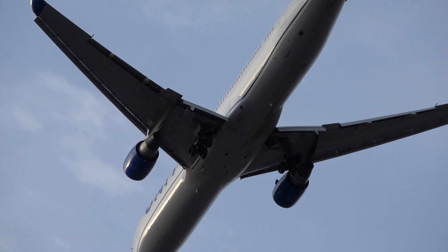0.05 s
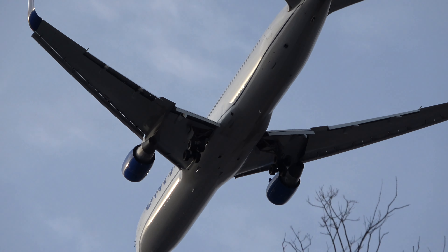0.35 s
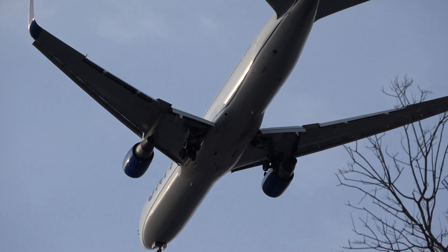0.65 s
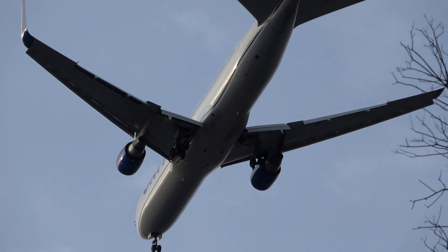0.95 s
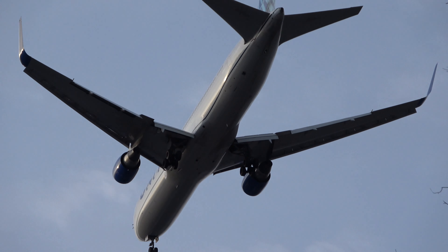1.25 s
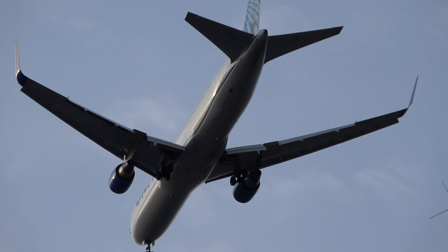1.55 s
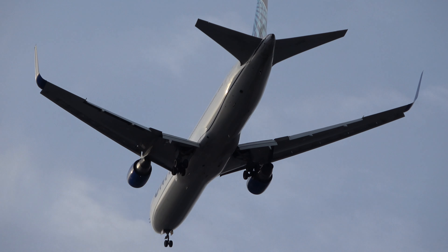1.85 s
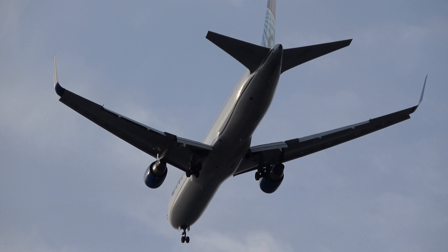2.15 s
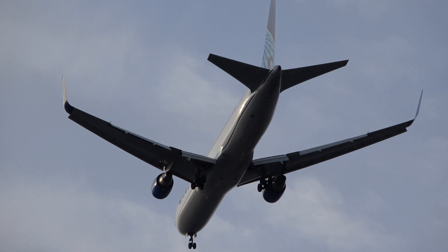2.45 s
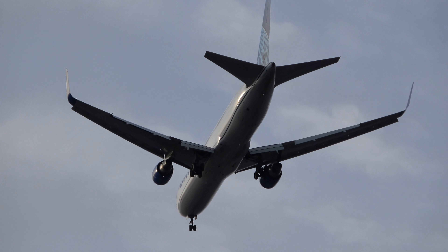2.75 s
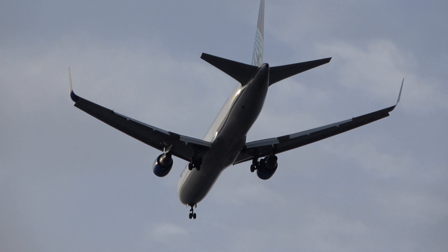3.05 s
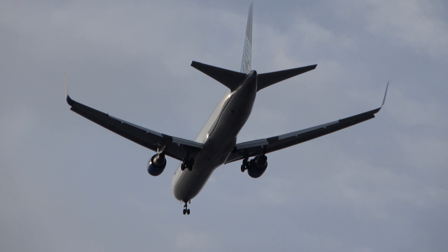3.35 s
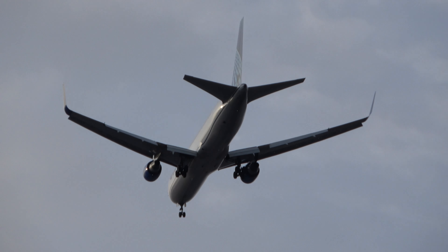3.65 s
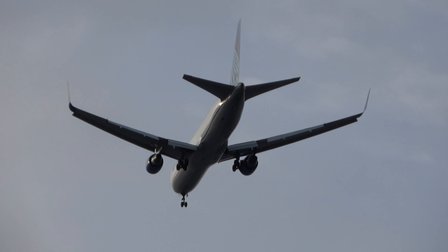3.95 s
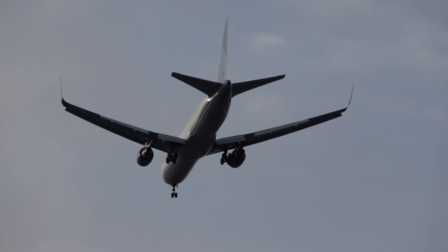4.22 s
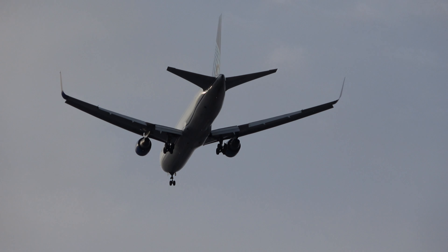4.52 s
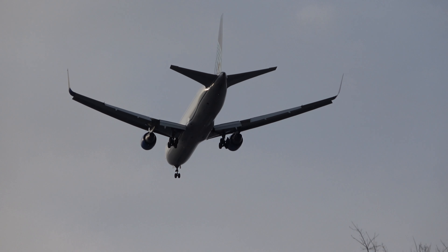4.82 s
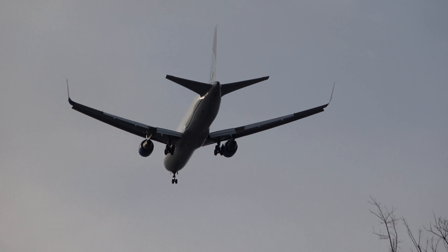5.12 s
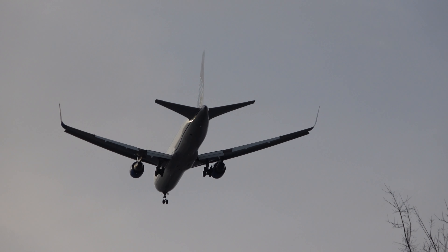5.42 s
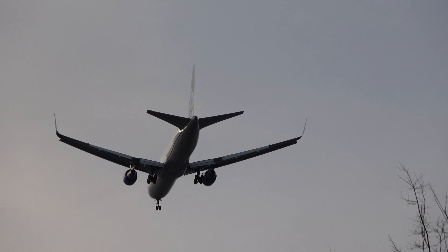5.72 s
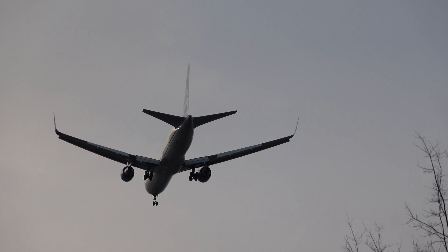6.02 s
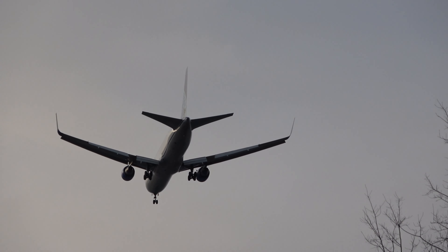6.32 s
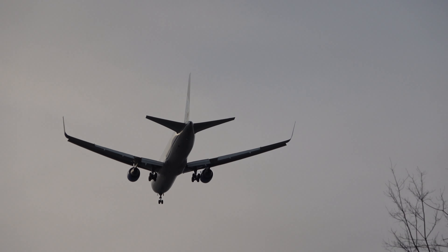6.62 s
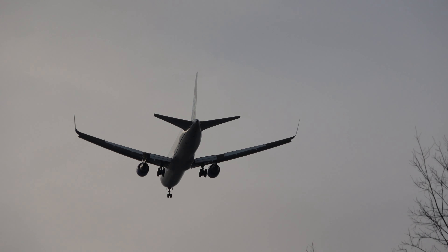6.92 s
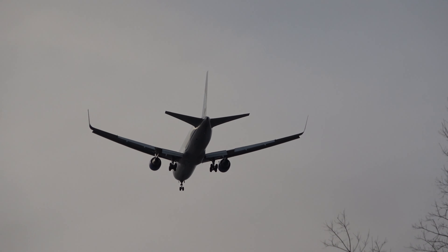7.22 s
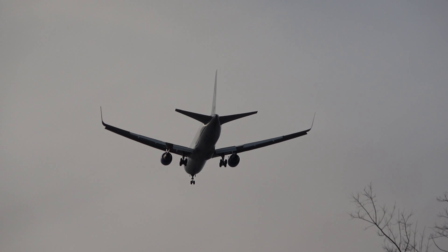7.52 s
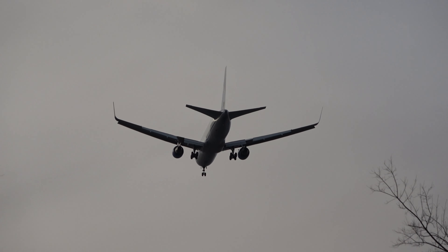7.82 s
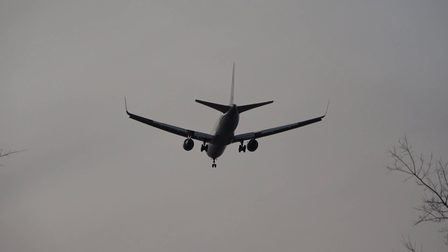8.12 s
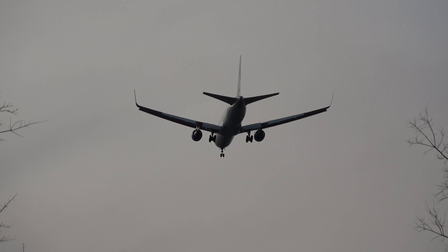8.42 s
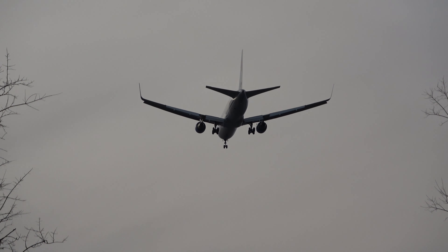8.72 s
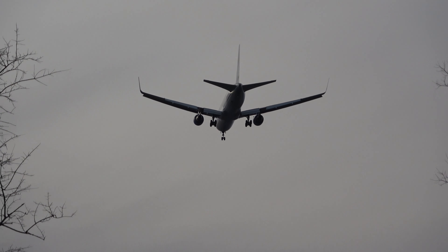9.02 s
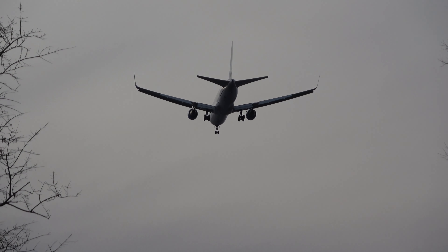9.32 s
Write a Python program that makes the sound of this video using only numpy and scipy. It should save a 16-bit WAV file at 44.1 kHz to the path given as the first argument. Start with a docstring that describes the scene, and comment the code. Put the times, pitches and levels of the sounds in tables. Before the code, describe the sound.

The loud rush and wavering whine of a passing twin-engine plane slowly fade outdoors, leaving a dull rumble with soft booms.

```python
"""Under the approach to a runway, a twin-engine airliner has just passed low overhead and draws away.
Exhaust and airframe noise mix with their echo off the ground into a rising sweep, and the air dulls
them with distance while low booms roll in. The whine of the two fans falls as the plane moves off
(the Doppler shift), then creeps up again as the engines gain speed.
Close by there are two faint ticks and a steady microphone hiss."""
import sys
import numpy as np
from scipy import signal
from scipy.fft import rfft, irfft, next_fast_len
from scipy.io import wavfile

SR = 44100
rng = np.random.default_rng(int(sys.argv[2]) if len(sys.argv) > 2 else 0)


def dump(signal):
    """Clip the signal to [-1, 1] and save it as 16-bit WAV at the path in sys.argv[1]."""
    limited = np.clip(np.atleast_2d(signal).T, -1, 1)
    pcm = np.round(limited * 32767).astype(np.int16)
    wavfile.write(sys.argv[1], SR, pcm)


N = 413206
TIME = np.arange(N) / SR


def gain(db):
    """Turn decibels into a number to multiply by."""
    return 10 ** (np.asarray(db) / 20)


def curve(table, at=TIME):
    """Join the (time_s, value) rows of a table with straight lines."""
    return np.interp(at, *np.transpose(table))


def tone_gain(table, hz):
    """Join (pitch_hz, level_db) rows along a musical pitch scale and give the gain at hz."""
    pitch_hz, level_db = np.transpose(table)
    return gain(np.interp(np.log(hz + 1), np.log(pitch_hz), level_db))


def hump(x, centre, width):
    """A smooth hump of height 1."""
    return np.exp(-(2 * (x - centre) / width) ** 2)


def filtered(sound, gain_at):
    """Turn each frequency of a sound up or down by gain_at(hz)."""
    size = next_fast_len(N, real=True)
    hz = np.arange(size // 2 + 1) * SR / size
    return irfft(rfft(sound, size) * gain_at(hz), size)[:N]


def noise(gain_at):
    """Noise of strength 1, its tone shaped by gain_at(hz)."""
    sound = filtered(rng.standard_normal(N), gain_at)
    return sound / np.std(sound)


def wobble(rate_hz):
    """A random drift of typical size 1 that changes up to about rate_hz times a second."""
    return noise(lambda hz: hump(hz, 0, 2 * rate_hz))


# Tone of the microphone hiss: pitch_hz, relative_db
MIC_HISS_TONE = [(100, -0.5), (3000, -0.5), (5500, -3), (9000, -9), (15000, -14)]
# The part of the hiss that differs between left and right, against the shared part: pitch_hz, relative_db
MIC_HISS_SIDE = [(4800, -24), (5800, -2), (12000, -1), (15000, -6)]


def microphone_hiss(level_db=-73):
    """Steady hiss, as mid (what left and right share) and side (how they differ)."""
    mid, side = (gain(level_db) * noise(lambda hz: tone_gain(MIC_HISS_TONE, hz)) for _ in range(2))
    return mid, filtered(side, lambda hz: tone_gain(MIC_HISS_SIDE, hz))


# Faint ticks close by: start_s, pitch_hz, width_hz, decay_s, level_db
NEARBY_TICKS = [(4.260, 4750, 700, .01, -64), (8.880, 6500, 3000, .003, -62.5)]


def ticks():
    """Tiny bursts of bright noise that die at once."""
    sound = 0
    for start_s, pitch_hz, width_hz, decay_s, level_db in NEARBY_TICKS:
        fade = (TIME >= start_s) * np.exp(-np.abs(TIME - start_s) / decay_s)
        sound += gain(level_db) * fade * noise(lambda hz: hump(hz, pitch_hz, width_hz))
    return sound


def flight(at=TIME, overhead_s=-1.34, fly_own_height_s=4.43, mach=.204):
    """The plane's distance, counted in flying heights, and the Doppler factor that lowers its pitch."""
    along = (at - overhead_s) / fly_own_height_s
    distance = np.hypot(along, 1)
    return distance, 1 / (1 + mach * along / distance)


def treble_loss(distance, overhead_db=-2, far_extra_db=27.5):
    """Treble lost in the air, in dB per octave; it grows as the plane draws away."""
    return overhead_db + far_extra_db * (1 - 1 / distance)


# How often blades pass in each fan, before the Doppler shift: idle_hz, rise_hz, middle_of_rise_s
FAN_SPEEDS = [(1262.6, 149.5, 5.82), (1283.2, 126.9, 5.61)]
# How much louder the lower fan is than the higher one: time_s, lead_db
LOWER_FAN_LEAD = [(0.1, -10), (0.33, 8), (0.47, -4), (0.85, -3), (1.05, 11), (1.28, 0), (1.6, 6), (2.2, 12),
                  (2.6, -1), (3.1, 8), (3.7, 5), (5, 2), (5.5, -2), (7, 9)]
# Tones at multiples of the blade rate, the second being the whine: multiple, relative_db
FAN_HARMONICS = [(1, -14), (2, 0), (3, -17.5), (4, -18.5)]
# Loudness of the whine before the loss with distance: time_s, level_db
WHINE_LEVELS = [(0, -42.5), (0.12, -39), (0.21, -46), (0.35, -37), (0.5, -39), (0.6, -45), (0.8, -43),
                (0.9, -38), (1.07, -40.5), (1.15, -48.5), (1.27, -35.5), (1.48, -49), (1.56, -42),
                (1.85, -43), (2.05, -47.5), (2.28, -55), (2.62, -49.5), (2.9, -58), (3.25, -53), (3.6, -56),
                (4.05, -63), (4.95, -59.5), (5.45, -64.5), (6.5, -62), (6.85, -62), (7.4, -65), (8.6, -71),
                (9.37, -70)]


def fan_whine(speed_up_s=1.31, waver_hz=1.865, fade_db=3.5, lift_db=1.2, loss_per_doubling_db=4.5):
    """Two fans beat against each other; churning air fades each tone and blurs it into narrow noise."""
    distance, doppler = flight()
    doublings = np.log2(distance)
    loss_db = treble_loss(distance)
    scatter = gain(-17.5 + 21 * doublings)  # blurred against clean sound: grows with distance
    lead_db = curve(LOWER_FAN_LEAD)
    sound = 0
    for (idle_hz, rise_hz, middle_s), other_fan_db in zip(FAN_SPEEDS, (-lead_db, lead_db)):
        blade_hz = idle_hz + rise_hz / (1 + np.exp((middle_s - TIME) / speed_up_s))
        heard_hz = doppler * blade_hz + waver_hz * wobble(rate_hz=14)
        phase = 2 * np.pi * np.cumsum(heard_hz) / SR
        share = 1 / np.hypot(1, gain(other_fan_db))
        eddy_a, eddy_b = wobble(rate_hz=55), wobble(rate_hz=55)
        for multiple, level_db in FAN_HARMONICS:
            # tones above the whine are blurred more, and distance takes them first
            octaves_above = np.log2(max(multiple / 2, 1))
            blur = scatter * gain(15 * octaves_above)
            sine = np.sin(multiple * phase)
            clean = np.sqrt(2) * sine * share * gain(fade_db * wobble(rate_hz=18))
            blurred = (eddy_a * sine + eddy_b * np.cos(multiple * phase)) / np.sqrt(2)
            tone = (clean + blur * blurred) / np.hypot(1, blur)
            sound += tone * gain(level_db - loss_db * octaves_above)
    return sound * gain(curve(WHINE_LEVELS) + lift_db - loss_per_doubling_db * doublings)


# Strength of the echo off the ground: time_s, strength_0_to_1
GROUND_BOUNCE = [(0, 0.52), (1.5, 0.48), (2.35, 0.72), (3.1, 0.65), (4.5, 0.43), (5.6, 0.26), (6.8, 0.17),
                 (8, 0.42), (9.37, 0)]


def ground_echo(hz, time_s, distance, treble_hz=1700, fill_hz=72, uneven_db=.7, lag_wander=.006):
    """Gain at each pitch as the ground's echo adds to some pitches and cancels others."""
    # rough ground scatters the treble, and bass from all around fills the lowest dip more with distance
    echo = curve(GROUND_BOUNCE, time_s) * np.exp(-(hz / treble_hz) ** 2)
    echo = echo * hz / np.hypot(hz, fill_hz * distance)
    # the lag shrinks as the plane sinks to the horizon, so the sweep climbs
    lag_ms = 2.32 * np.exp(-time_s / 1.85) + 4.8 - .18 * time_s
    # uneven ground makes the echo come and go, and its lag wander
    level_drift, lag_drift = (np.interp(time_s, TIME, wobble(rate_hz=3)) for _ in range(2))
    echo = np.minimum(echo * gain(uneven_db * level_drift), .95)
    lag_ms = lag_ms * (1 + lag_wander * lag_drift)
    # bass comes back with its wave shifted, which lifts the lowest dips
    bass_shift = .22 / (1 + (hz / 260) ** 2)
    return np.abs(1 + echo * np.exp(1j * (bass_shift - 2 * np.pi * hz * lag_ms / 1000)))


def air_dulling(hz, distance, knee_hz=1150, gentle_hz=6300, gentle_share=.4):
    """Gain at each pitch as air soaks up the treble above knee_hz, and more gently above gentle_hz."""
    octaves = np.log2(1 + (np.minimum(hz, gentle_hz) / knee_hz) ** 10) / 10
    octaves = octaves + gentle_share * np.log2(np.maximum(hz / gentle_hz, 1))
    return gain(-treble_loss(distance) * octaves)


# Tone of the jet noise close by: pitch_hz, relative_db
JET_TONE = [(20, -13.5), (35, -16.5), (60, 1), (150, 1.5), (300, 1.5), (500, -2.5), (1100, -8.5),
            (2000, -15.5), (3000, -24.5), (6000, -29.5), (9500, -36), (12000, -43), (13300, -47),
            (14200, -54), (15700, -59)]
# Humps and hollows in the turbine noise, before the Doppler shift: pitch_hz, width_hz, lift_db
TURBINE_HUMPS = [(3500, 550, 2.8), (4170, 380, -3.2), (4560, 550, 3)]
# How far a hollow drone stands out of the roar: time_s, lift_db
DRONE_LIFT = [(0, -0.5), (1.8, -0.5), (3, 1), (5.1, 2.5), (5.75, -1.5), (6.3, 4.5), (6.7, 6), (7.2, 0.5),
              (8.4, 4.5), (9.37, 7)]


def engine_tone(hz, time_s, drone, deep_hz=55):
    """Gain at each pitch for the engines heard from behind: jet, turbine, deep rumble and drone."""
    distance, doppler = flight(time_s)
    turbine_db = sum(db * hump(hz / doppler, pitch, width) for pitch, width, db in TURBINE_HUMPS)
    # the deepest rumble beams backwards, so its share grows as the plane draws away
    deep_db = treble_loss(distance) / (1 + (hz / deep_hz) ** 4)
    drone_db = drone * curve(DRONE_LIFT, time_s)
    return tone_gain(JET_TONE, hz) * gain(turbine_db + deep_db + drone_db)


# Low booms: peak_s, length_s, pitch_hz, width_hz, lift_db, drone_lift_db
LOW_BOOMS = [(0.43, .15, 160, 130, 5.5, -4.5), (2.3, .16, 130, 200, 4.5, 2),
             (2.857, 0.15, 210, 200, 4.5, -3.5), (4.135, 0.13, 180, 110, 2.5, -1),
             (5.918, .13, 70, 170, 9, 7), (6.3, 0.21, 75, 170, 10, 7.5), (6.555, 0.091, 90, 150, 5, 8.5),
             (6.82, .08, 64.6, 80, 4, -1), (7.03, 0.27, 69.6, 290, 7, 0.5), (7.502, 0.13, 70, 90, 3, 1),
             (7.9, .35, 180, 119, 2, 0.5)]


def booms(hz, time_s, drone):
    """Gain for booms rolling in from behind the plane; each swells at its pitch and stirs the drone."""
    swell_db = 0
    for peak_s, length_s, pitch_hz, width_hz, lift_db, drone_lift_db in LOW_BOOMS:
        peak_db = lift_db * hump(hz, pitch_hz, width_hz) + drone_lift_db * drone
        swell_db += hump(time_s, peak_s, length_s) * peak_db
    return gain(swell_db)


# Loudness of the four bands of jet noise, low to high, before the booms: time_s, level_db
EXHAUST_RUMBLE = [(0, -20.5), (0.3, -28.5), (0.52, -32), (0.82, -32), (1.04, -27), (1.45, -29.5),
                  (1.95, -32), (2.28, -31), (2.68, -36), (3.4, -33), (3.9, -33.5), (5.2, -33.5),
                  (5.65, -35.5), (6.1, -39), (6.7, -38.5), (7.3, -34.5), (8.8, -35), (9.37, -38)]
EXHAUST_ROAR = [(0, -21.5), (0.25, -22.5), (0.42, -22.5), (0.85, -24), (1.6, -25), (3.5, -25.5),
                (3.88, -29), (4.2, -28), (5.2, -31.5), (5.75, -35.5), (6.15, -37), (6.75, -35), (7.0, -33),
                (7.5, -33), (8.45, -33.5), (8.8, -36.5), (9.37, -34.5)]
AIRFRAME_RUSH = [(0, -29.5), (1.3, -31), (2.4, -32.5), (3.68, -31.5), (3.9, -35.5), (4.75, -36), (5.5, -41),
                 (6.55, -43), (7.05, -41), (7.7, -41), (8.9, -45), (9.37, -43.5)]
ENGINE_HISS = [(0, -37.5), (0.09, -41.5), (0.17, -41.5), (0.22, -43.5), (0.325, -43.5), (0.355, -39.5),
               (0.39, -40.5), (0.47, -40), (0.52, -42.5), (0.6, -40.5), (0.71, -43), (0.76, -46.5),
               (0.84, -46.5), (0.98, -42), (1.1, -46), (1.24, -44.5), (1.45, -49.5), (2.17, -50),
               (2.25, -53.5), (2.45, -54.5), (2.64, -51), (3.0, -56), (3.33, -52.5), (3.68, -54.5),
               (3.78, -56), (4.15, -60), (4.65, -63), (4.8, -59), (5.25, -63), (5.42, -66), (9.37, -70)]
# Where those bands begin and end: edge_hz
BAND_EDGES = [18, 130, 650, 2400, 17000]
# The part of the jet noise that differs between left and right, giving it width: pitch_hz, relative_db
JET_SIDE_TONE = [(30, -23.5), (130, -22.5), (190, -20.5), (290, -30), (460, -23), (600, -25.5), (1200, -26),
                 (1900, -26), (2700, -22), (3400, -23.5), (4800, -32.5), (6000, -32.5), (7700, -23),
                 (9500, -29), (14000, -23.5)]


def jet_noise(drone_hz=348, drone_width_hz=66, flutter_db=(.5, .5, .4, .9), frame=2048):
    """Churning exhaust and air rushing over the plane, heard in four bands; gives mid and side."""
    # cut plain noise into short frames, so that its tone can change over time
    hz, time_s, white = signal.stft(rng.standard_normal((2, N)), SR, nperseg=frame)
    hz = hz[:, None]
    distance, doppler = flight(time_s)
    drone = hump(hz, drone_hz * doppler, drone_width_hz * distance)  # broadens with distance
    tone = engine_tone(hz, time_s, drone) * ground_echo(hz, time_s, distance) * air_dulling(hz, distance)
    swell = booms(hz, time_s, drone)
    band_levels = (EXHAUST_RUMBLE, EXHAUST_ROAR, AIRFRAME_RUSH, ENGINE_HISS)
    sound = 0
    for low_hz, high_hz, levels, depth_db in zip(BAND_EDGES, BAND_EDGES[1:], band_levels, flutter_db):
        band = tone / np.sqrt((1 + (low_hz / (hz + 1)) ** 20) * (1 + (hz / high_hz) ** 20))
        band = band / np.sqrt(np.mean(band ** 2, axis=0))  # same strength in every frame
        band_noise = signal.istft(white * band * swell, SR, nperseg=frame)[1][:, :N]
        # swirls of air along the way make each band flutter
        sound += band_noise * gain(curve(levels) + depth_db * wobble(rate_hz=18))
    mid, side = sound
    return mid, filtered(side, lambda hz: tone_gain(JET_SIDE_TONE, hz))


# Peaks and dips added by the case around the microphones: pitch_hz, width_hz, lift_db
CASE_HUMPS = [(145, 60, -1.2), (410, 90, 1.2), (620, 110, -1), (500, 70, 1), (980, 130, 1.8), (1180, 80, 2),
              (1650, 250, 1), (2150, 220, -2), (2620, 260, -2), (4550, 400, .7), (5200, 700, -4),
              (5900, 600, .5), (8300, 900, -2.5), (11100, 800, -2.5), (11850, 550, 2)]
# How the two microphone openings differ in tone: pitch_hz, left_minus_right_db
OPENING_BALANCE = [(30, 1.3), (60, 2.6), (100, 5.3), (160, 7.8), (230, 5.3), (290, .7), (380, -.4),
                   (480, -3.6), (630, -2.8), (800, -4), (980, -4.1), (1200, -1.7), (1380, .7), (1950, 0),
                   (2400, -2.5), (2750, -2.1), (2900, 1.1), (4000, 0)]


def scene():
    """The plane and the ticks as two closely spaced microphones hear them, over their own hiss."""
    def case_gain(hz):
        return gain(sum(db * hump(hz, pitch, width) for pitch, width, db in CASE_HUMPS))

    def side_share(hz):
        left_over_right = tone_gain(OPENING_BALANCE, hz)
        return (left_over_right - 1) / (left_over_right + 1)

    jet_mid, jet_side = jet_noise()
    plane = filtered(jet_mid + fan_whine(), case_gain)
    hiss_mid, hiss_side = microphone_hiss()
    mid = hiss_mid + ticks() + plane
    side = hiss_side + jet_side + filtered(mid, side_share)
    return np.array([mid + side, mid - side])


def record(dry):
    """A steep filter cuts off the highest treble."""
    top_hz = 15700
    return signal.sosfilt(signal.ellip(10, .1, 80, top_hz, fs=SR, output="sos"), dry)


dry = scene()
out = record(dry)
dump(out)
```